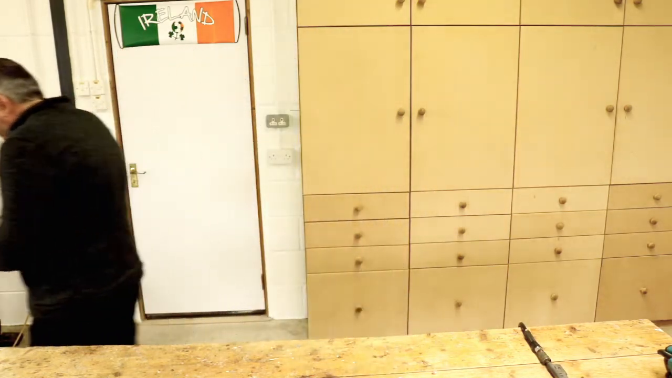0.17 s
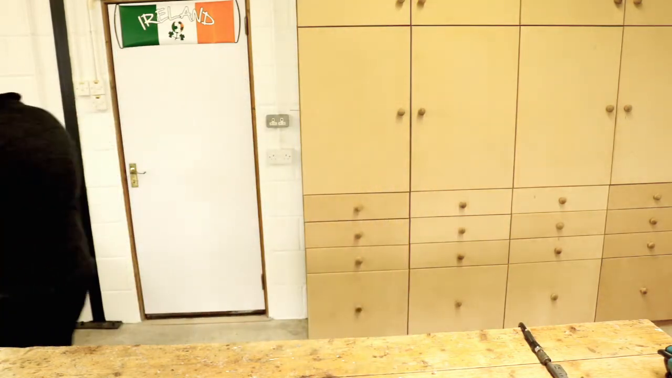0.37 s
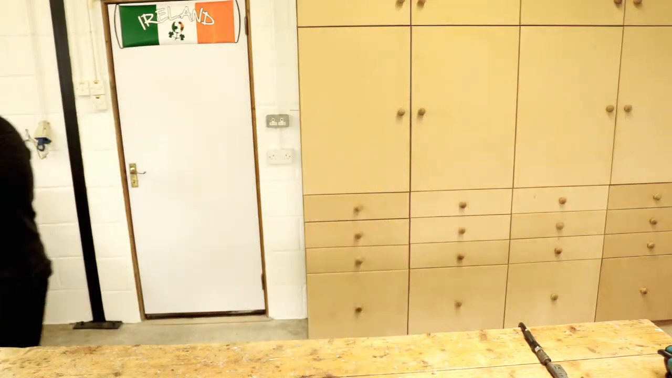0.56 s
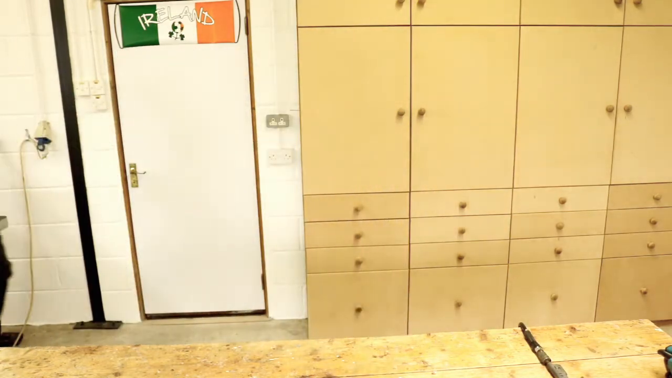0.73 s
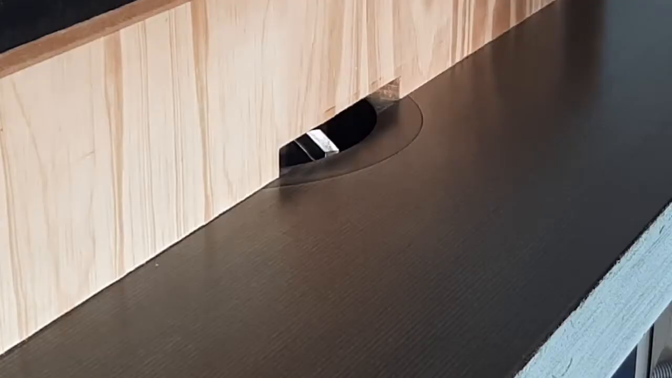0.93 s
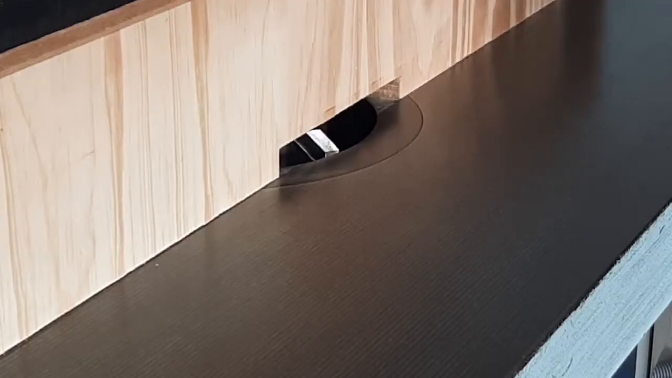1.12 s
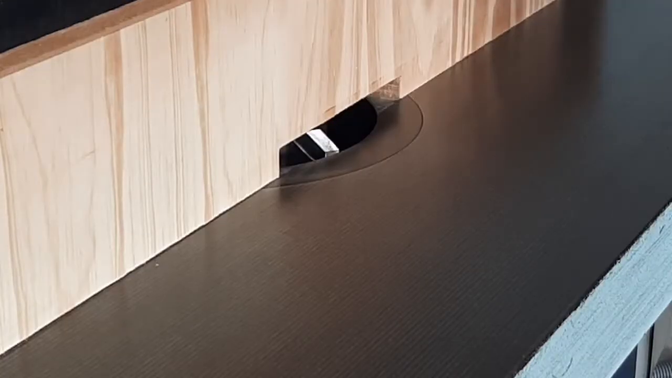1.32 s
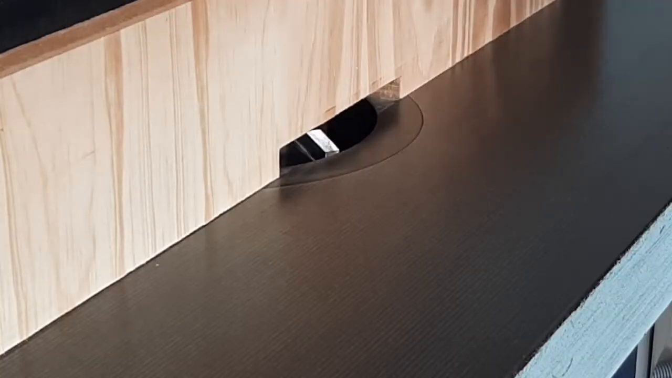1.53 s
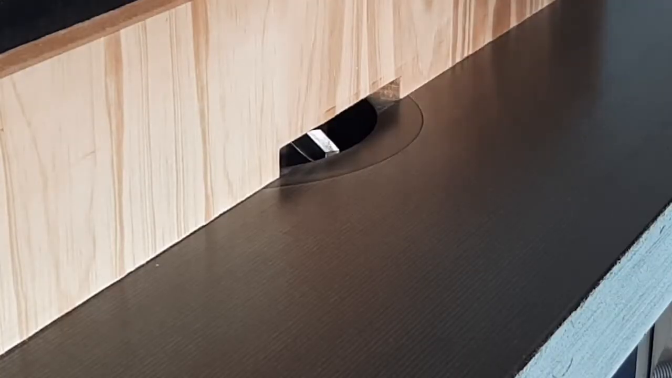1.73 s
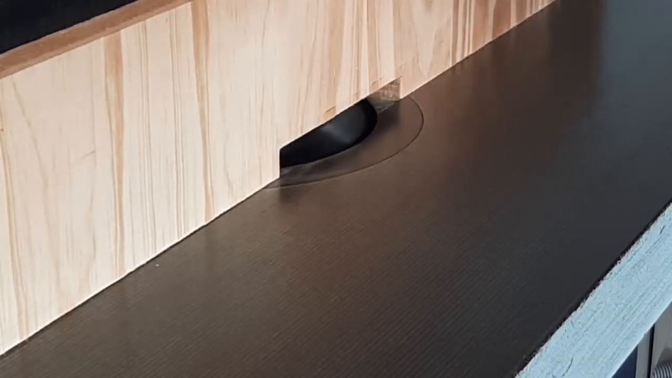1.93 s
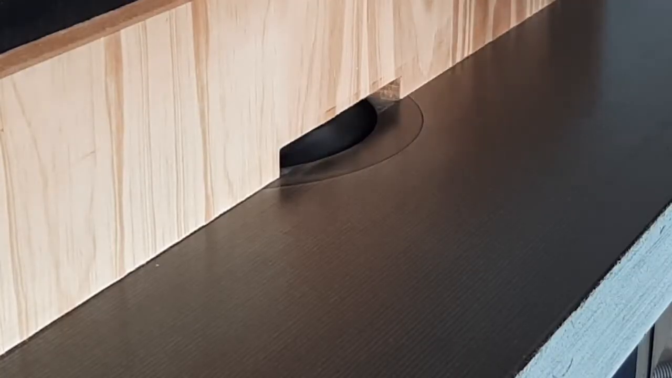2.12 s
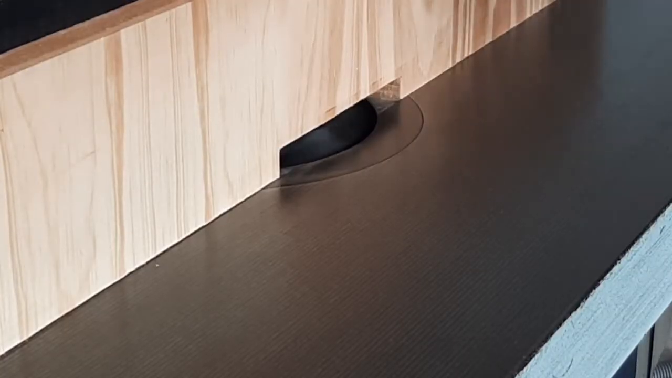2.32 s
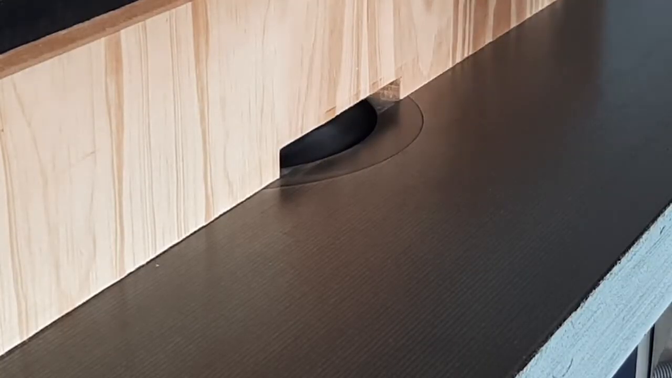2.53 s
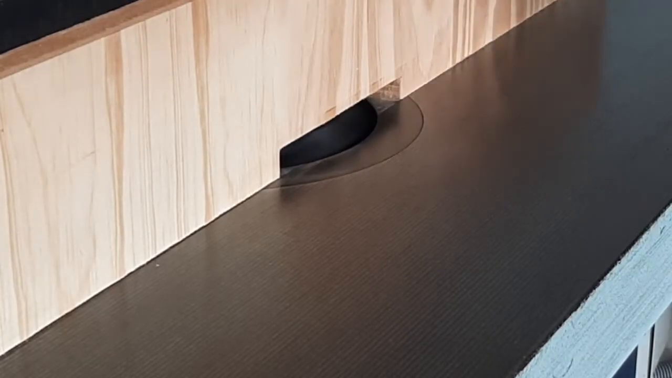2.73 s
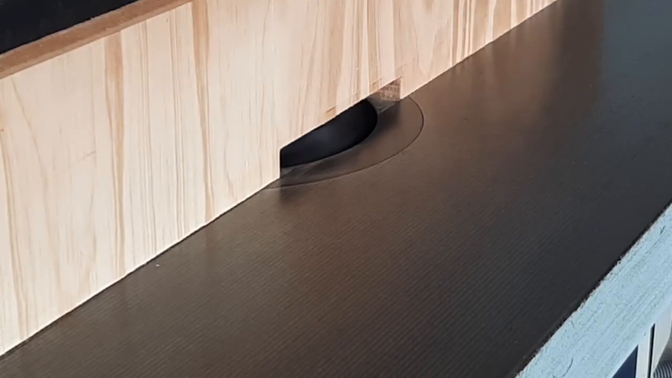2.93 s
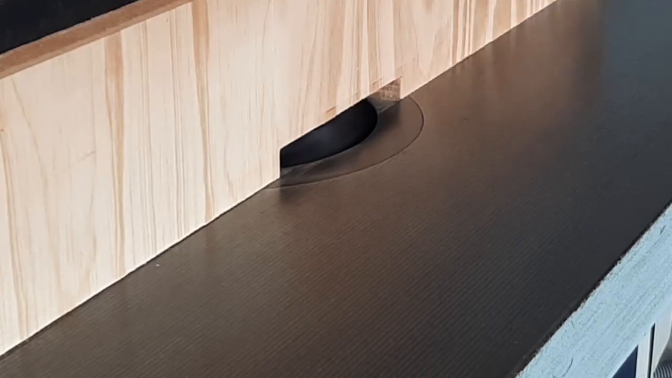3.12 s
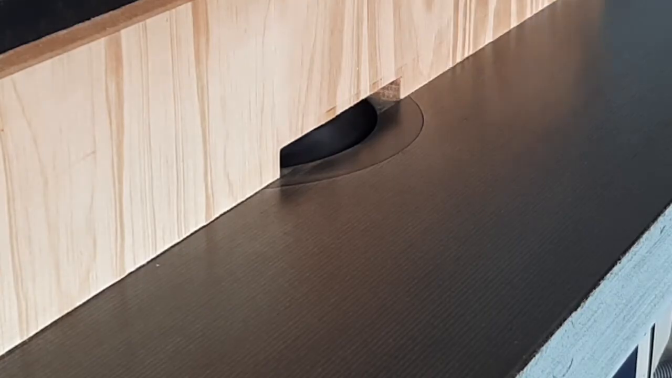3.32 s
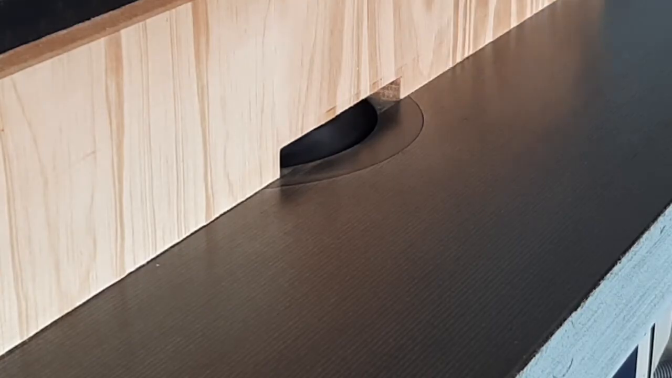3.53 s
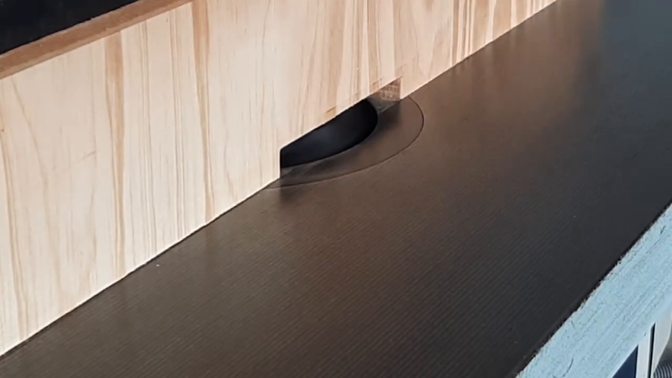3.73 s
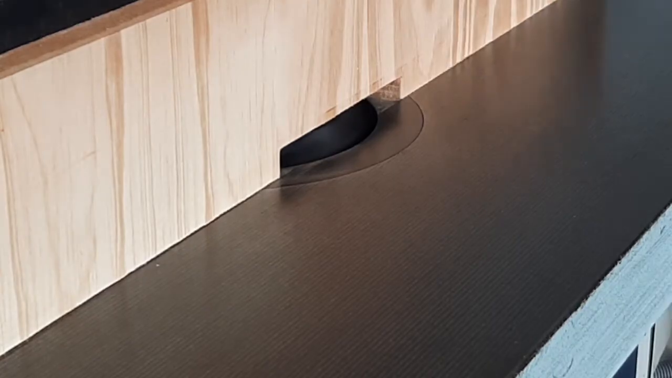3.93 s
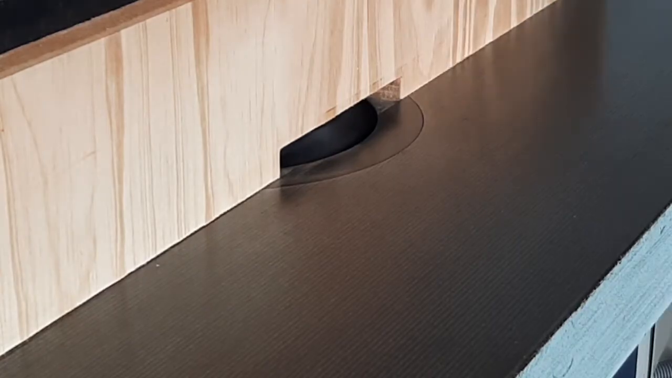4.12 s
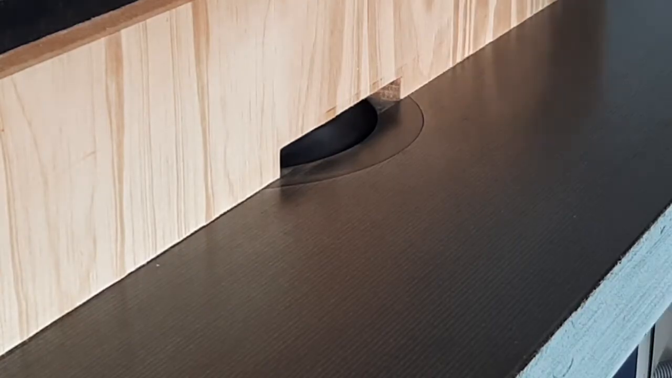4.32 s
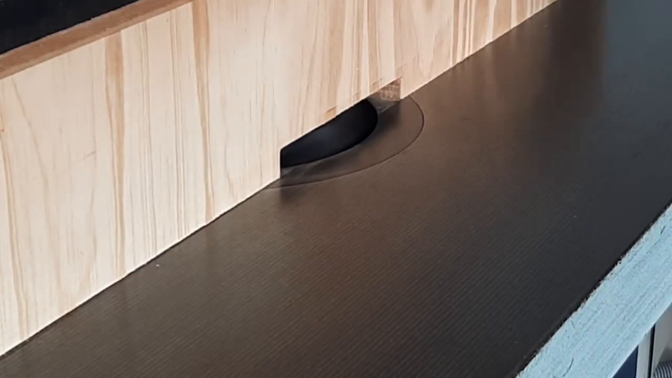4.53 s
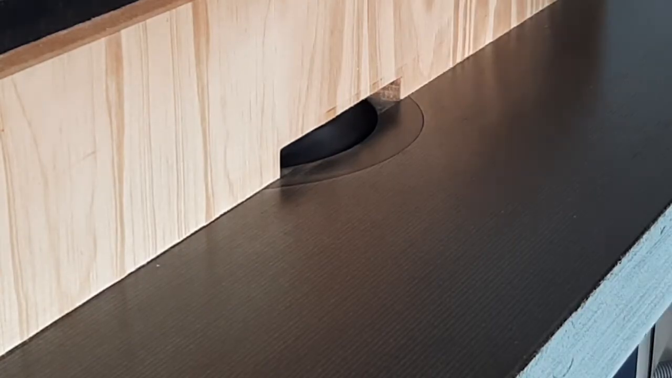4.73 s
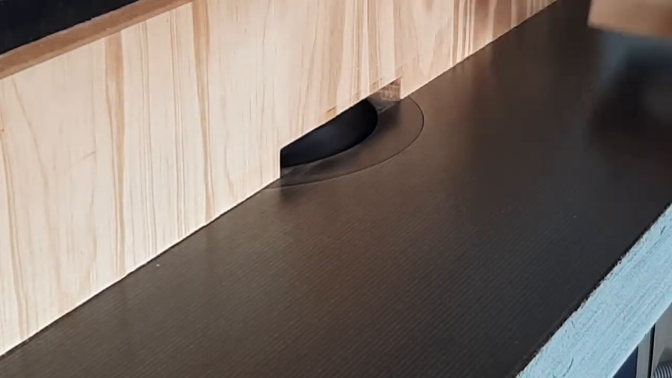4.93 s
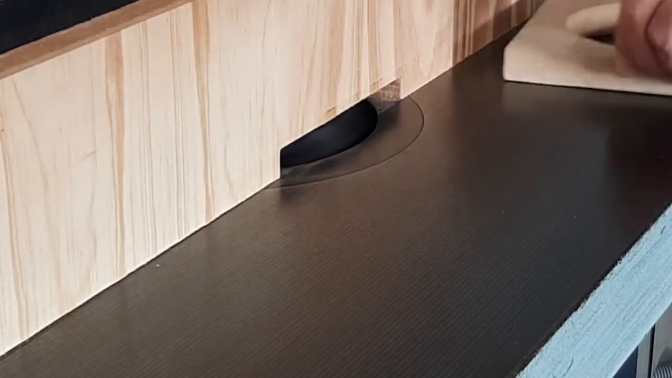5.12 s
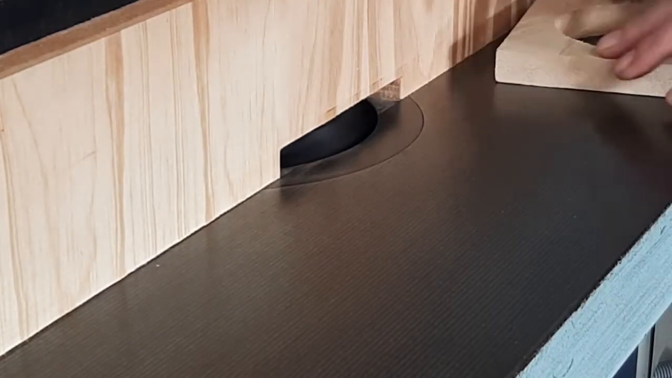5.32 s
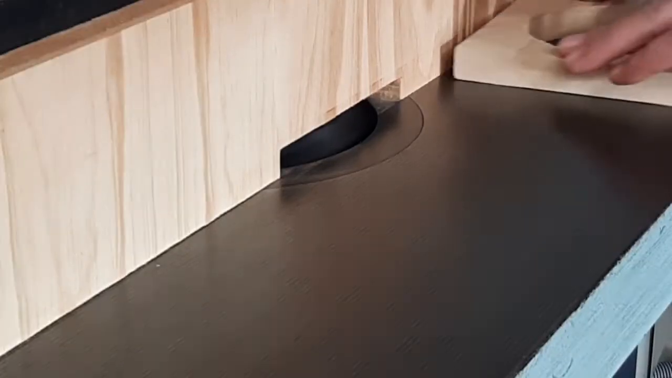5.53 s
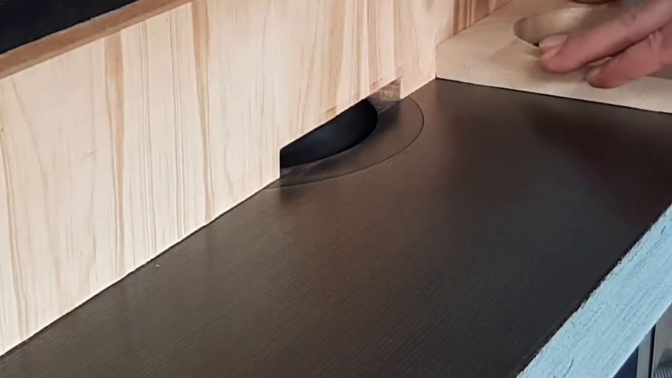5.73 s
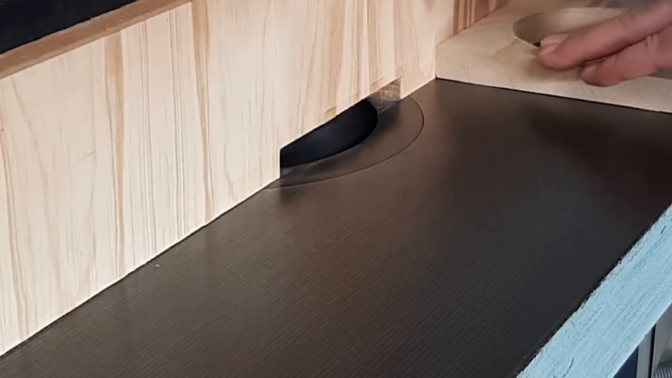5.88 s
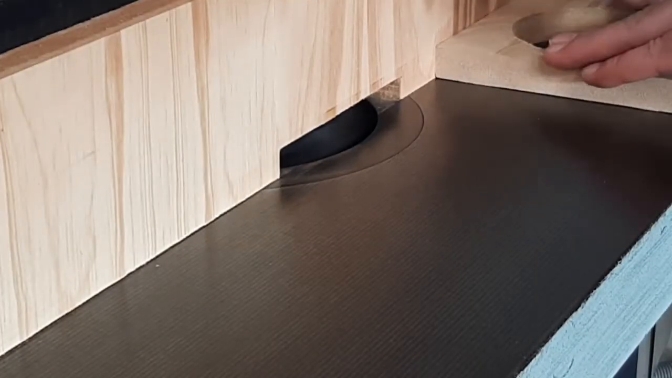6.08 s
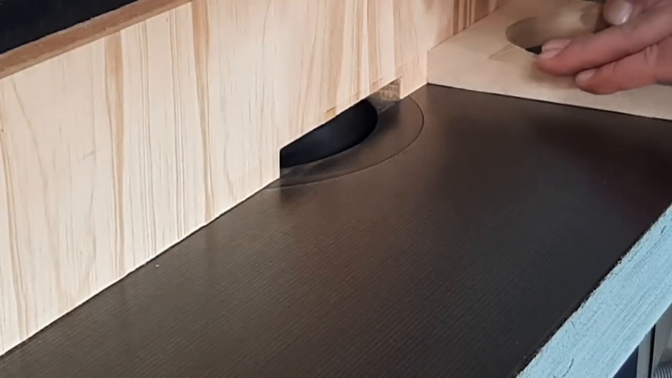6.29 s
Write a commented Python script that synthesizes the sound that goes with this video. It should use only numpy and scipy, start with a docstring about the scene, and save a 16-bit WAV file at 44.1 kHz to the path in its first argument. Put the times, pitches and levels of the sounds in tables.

```python
"""A soft air hiss and low shuffling come first, then a hard knock rings in a room and is faded out in steps.
After this first scene, mostly in mono, a close stereo scene in a joinery workshop takes over: a dust extractor
runs, a switch clicks and a spindle moulder starts. Its motor hums on the mains while the two-knife cutter spins
up and beats against the hum. Hums and rings are sine waves; hiss, rush and wind are coloured noise."""
import sys
import numpy as np
from scipy import signal
from scipy.fft import rfft, irfft, next_fast_len
from scipy.io import wavfile

SR = 44100
rng = np.random.default_rng(int(sys.argv[2]) if len(sys.argv) > 2 else 0)


def file_out(sig):
    """Save sig as 16-bit WAV at sys.argv[1]."""
    # one column per channel
    cols = np.atleast_2d(sig).T
    # limit, then scale
    lim = np.clip(cols, -1, 1)
    pcm = np.round(lim * 32767).astype(np.int16)
    wavfile.write(sys.argv[1], SR, pcm)


N = 280035
TIME = np.arange(N) / SR
FIRST_SCENE_END_S = .8595
TOP_CUT_HZ = 16020

# Spindle speed while it spins up: time_s, speed_hz (turns a second)
SPIN_UP = [(1.81, 1), (2.3, 39.5), (2.5, 55.3), (2.72, 81.2), (2.89, 99.8), (2.95, 104), (3.05, 105.05)]
# Cutter tones, before the changes with speed: multiple of a turn, level_db, left_over_right_db, left_lead_radians
CUTTER_TONES = [(1, -41, 0, 0), (2, -34.5, 0, -.18), (3, -68, 1, .1), (4, -47.8, -1, .03), (5, -63, 0, 0),
                (6, -50, -1.5, -.3), (7, -61, 0, 1.4), (8, -46.8, 0, .9), (9, -67, 0, 0),
                (10, -54.2, 3, .01), (12, -58.7, -2, .6), (14, -64.5, 4, .6), (18, -69, 0, 0),
                (24, -70, 0, 0)]
# Cabinet resonances and dead spots that the cutter tones sweep through: pitch_hz, width_hz, lift_db
CABINET = [(50, 60, -17), (103, 20, 8), (145, 34, -14), (190, 60, 13), (203, 9, 8), (220, 30, 4),
           (255, 50, 18), (300, 50, -6), (365, 60, 10), (450, 60, 4), (540, 60, 5), (675, 50, 10),
           (838, 70, 6), (970, 50, 8)]
# Colour of the cutter wind: pitch_hz, level_db (per Hz)
WIND_COLOUR = [(15, -67), (60, -15), (110, -3.5), (155, -20.5), (230, -9.5), (450, -8), (800, -16.5),
               (1150, -19), (4000, -24.5), (7570, -32), (8670, -47), (11300, -39.5), (15700, -46)]
# Casing resonances that colour the wind: pitch_hz, width_hz, lift_db
CASING = [(340, 17, 1.5), (380, 120, 0), (526, 12.5, 3.5), (668, 35, 4), (760, 26, -5.5), (910, 480, 6.5),
          (1496, 140, 5.5), (1563, 26, 8), (2032, 87, 6), (2160, 72, 8), (2175, 40, -7), (2540, 50, 3.5)]
# Panels that buzz as the spindle passes their speed: pitch_hz, width_hz, level_db,
# speed_share (of full speed), share_span (of full speed)
PANELS = [(428, 48, -45.5, 0.41, 0.16), (663.4, 39, -47.5, 0.6, 0.22), (879, 40, -54, .6, 0.18),
          (973, 26, -52, .85, 0.085), (1200, 50, -54.5, 0.89, .07), (296, 25, -46, 0.75, .05),
          (200, 12, -44, 0.92, .02)]
# Colour of the shaking panels: pitch_hz, level_db (per Hz)
SHAKE_COLOUR = [(150, -42), (300, 1), (700, 9), (1100, -4), (1800, -33)]
# How alike left and right are in most wide noises: pitch_hz, likeness (1 is the same)
LIKENESS = [(60, 0.92), (130, 0.97), (290, 0.98), (640, 0.6), (1410, 0.79), (3100, 0.53), (6820, 0.75),
            (15000, 0.18)]
MAINS_HUM_HZ, BEAT_PEAK_S = 100.03, 4.62
MOTOR_ON_S, MOTOR_RISE_S, PULL_END_S, PULL_RELEASE_S = 1.907, 0.019, 2.926, 0.084
# hum level before its changes, gain at full speed, surge under pull
HUM_DB, HUM_FULL_SPEED_DB, HUM_SURGE_DB, SURGE_POWER = -36.5, 1.5, 10, 5.4
# the hum throbs at low speed
THROBS_PER_S, THROB_DIP_S, THROB_DEPTH = 10.6, 2.08, .7
WIND_DB, WIND_DB_PER_DECADE = -40, 7
# the wind turns bright around this share of full speed
EDGE_DULL_DB, EDGE_SHARE, EDGE_SPAN = -16, 0.57, 0.084
KNIFE_EARLY_DB_PER_DECADE, KNIFE_DB, KNIFE_PULL_DB, KNIFE_CREEP_DB_PER_S = 25, -2.5, -0.5, 1.5
RUN_UP_UNREST = .2   # the cutter tones waver by this share more before full speed
SHAKE_DB, SHAKE_RISE_S, SHAKE_END_S = -46, 0.32, 2.85

# Start switch, its press, latch and bounce: start_s, crackle_db, box_ring_db, button_ring_db
SWITCH_CONTACTS = [(1.775, -36, -50, -36), (1.813, -41.5, -58, -49), (1.8223, -48, -27.5, -41),
                   (1.8303, -58, -37, -58)]
# Ring of the switch box: pitch_hz, level_db (added to the ring), t60_s (time to die by 60 dB)
BOX_MODES = [(1506, 0, 0.07), (1556, -9, 0.14)]
# Ring of the button: pitch_hz, level_db (added to the ring), t60_s (time to die by 60 dB)
BUTTON_MODES = [(2090, 0, 0.049), (1390, -1, 0.04), (2640, -7, 0.03), (404, 7.5, 0.069), (90, 3, 0.2)]
# Faint ticks in the run-up: start_s, level_db
TICKS = [(2.315, -42), (2.365, -43)]
SWITCH_LAG_S = 0.0001   # the switch is nearer the left side

# The knock and its bounces: start_s, level_db, brightness_db, crack_hz
KNOCKS = [(.6108, -32, 0, 2300), (.6152, -23, -20, 230), (.6176, -22.5, 0, 1950), (.6187, -16, 0, 4300),
          (.6226, -19, -4, 330), (.6227, -22, -1, 2300), (.6243, -13.5, -6, 6250), (.633, -23.5, -10, 260),
          (.638, -23, -12, 300), (.662, -24, -20, 340), (.705, -21, -20, 180), (.721, -27, -20, 120),
          (.731, -28, -20, 130), (.763, -25, -20, 280)]
# Colour of the knock noise: pitch_hz, level_db (per Hz)
KNOCK_COLOUR = [(24, -33), (60, -37), (200, 0), (480, -6.5), (700, -10.5), (1050, -12.5), (1450, -15),
                (1800, -9.5), (2500, -11), (4200, -5.5), (6300, -14.5), (7200, -21.5), (9700, -39),
                (14000, -58)]
# Resonances in the knock noise: pitch_hz, width_hz, lift_db
KNOCK_RINGS = [(2080, 150, 8.5), (2270, 54, 10), (2590, 60, 12), (3160, 53, 6), (3920, 57, -3),
               (4200, 56, 4), (4630, 120, 0), (5000, 37, 6.5), (6060, 280, 6)]
KNOCK_PATCHY_DB = 1.5
ROOM_T60_S, ROOM_DB, FIRST_ECHO_S = 0.81, -13.5, 0.0033

# Tones of the seven-blade fan: multiple of a turn, level_db, left_over_right_db, left_lead_radians
FAN_TONES = [(1, -60.5, 3, 0), (2, -51.5, 1, 0), (4, -48, -3, 0.1), (5, -60.5, 0, 0), (6, -71, 2, 0),
             (7, -47, 14, 0.63), (11, -69, 7, 0.44), (12, -58.5, 3, 0), (13, -61, -3, 0.23),
             (14, -70, 21, 0.24)]
# Thin whines of the extractor: pitch_hz, level_db
WHINES = [(10917, -75), (11326, -89.5), (13647, -80), (14223, -83)]
# Colour of the air rush: pitch_hz, level_db (per Hz)
RUSH_COLOUR = [(15, -54), (40, -28), (96, -8), (200, -6), (450, -17.5), (700, -14), (1150, -20),
               (1800, -21.5), (3500, -23.5), (5500, -29.5), (7100, -25.5), (8000, -29), (8700, -54.5),
               (11000, -31.5), (15700, -30.5)]
# Duct resonances in the rush: pitch_hz, width_hz, lift_db
DUCT = [(195.6, 8.2, 11), (96.5, 14, 8), (450, 83, 10), (1517, 68, 9), (4390, 240, 5.5)]
# How alike left and right are in the rush: pitch_hz, likeness (1 is the same, below 0 is opposed)
RUSH_LIKENESS = [(60, 0.99), (110, 1), (200, 0.91), (380, 0.86), (700, 0.16), (1290, -0.71), (2380, 0.17),
                 (4400, -0.16), (8120, 0.15), (15000, 0.3)]
FAN_TURN_HZ, RUSH_DB = 49.17, -42.5
# the extractor sinks as the spindle gains speed, down to the full sink at this share of full speed
TONE_SINK_DB, RUSH_SINK_DB, SINK_DONE_SHARE = -7, -4, 0.45

# Low shuffles, each with a dull thud: start_s, rumble_db, thud_db, thud_hz
SHUFFLES = [(.028, -39, -25.5, 163), (.046, -48, -26, 251), (.058, -53, -32, 106), (.079, -48, -32, 188),
            (.12, -46, -35, 210), (.142, -50, -32, 155), (.185, -46, -30, 248), (.227, -47, -35, 200),
            (.275, -49, -40, 90)]
# Colour of the shuffling: pitch_hz, level_db (per Hz)
SHUFFLE_COLOUR = [(12, -36), (20, -18), (96, -5.5), (155, -1.5), (188, -3.5), (274, -5.5), (323, -10),
                  (511, -23), (602, -25), (1000, -39), (1300, -52), (2200, -120)]
# Colour of the soft air hiss: pitch_hz, level_db (per Hz)
HISS_COLOUR = [(290, -6.5), (500, -0.5), (676, -4), (737, -4), (1070, -7), (1430, -8), (1530, -7.5),
               (1720, -6), (2130, -9.5), (4910, -4.5), (7780, -18.5), (15500, -53)]
# Low drone of the first scene: pitch_hz, level_db
ROOM_DRONE = [(46.5, -45), (93.7, -43.5)]
# Colour of the preamp hiss: pitch_hz, level_db (per Hz)
PREAMP_COLOUR = [(3000, -10), (7000, -7), (10000, 9), (15800, 7.5)]
# Steps that fade out the first scene: start_s, change_db
FADE_STEPS = [(.789, -8.5), (.833, -7)]
HISS_DB, HISS_HOLD_S, HISS_FALL_DB_PER_S = -44, 0.35, 12   # the air hiss holds, then sinks
THUD_CYCLES = 3.0   # cycles to die by 20 dB
SHUFFLE_RISE_S, SHUFFLE_T60_S, SHUFFLE_FLOOR_DB = 0.015, 0.33, -50.5
PREAMP_DB, FADE_RAMP_S = -61, .01


def moulder():
    """Mains hum, cutter tones that swell as they sweep resonances, knife-puffed wind and shaking panels."""
    speed, share = spindle_speed(), speed_share()
    running = attack(MOTOR_ON_S, MOTOR_RISE_S)
    settled = attack(PULL_END_S, PULL_RELEASE_S)
    pull = share ** SURGE_POWER * (1 - settled)   # the motor pulls hardest just below full speed
    angle = 2 * np.pi * np.cumsum(speed) / SR
    angle -= angle[round(BEAT_PEAK_S * SR)]   # hum and unbalance tone add up at this moment
    hum = mains_hum(share, pull)
    tone = cutter(angle, speed, share, pull, settled)
    wind = cutter_wind(angle, share)
    return hum * running + tone + panels(share, settled) + running * wind


def mains_hum(share, pull):
    """The motor hums at a fixed mains pitch, throbs at low speed and surges when it pulls hard."""
    hum_db = HUM_DB + HUM_FULL_SPEED_DB * np.sqrt(share) + HUM_SURGE_DB * pull + 0.29 * drift(6.5)
    dips = np.cos(np.pi * THROBS_PER_S * (TIME - THROB_DIP_S)) ** 4
    throb = 1 - THROB_DEPTH * (1 - share) * dips
    wave = np.cos(2 * np.pi * MAINS_HUM_HZ * (TIME - BEAT_PEAK_S))
    return np.sqrt(2) * throb * amp(hum_db) * wave * amp([[.8], [-.8]])


def cutter(angle, speed, share, pull, settled):
    """Tones locked to the turning cutter grow with speed and swell where they meet cabinet resonances."""
    growth_db = 26 * np.log10(share)
    # the tone of the knife passes comes early, dips slightly under the pull, then creeps up
    knife_db = (KNIFE_DB - KNIFE_EARLY_DB_PER_DECADE * np.log10(share) + KNIFE_PULL_DB * pull
                + KNIFE_CREEP_DB_PER_S * np.maximum(TIME - PULL_END_S, 0))

    def lift_db(k):
        """Level change of one tone with speed; k=2 is the pass of the two knives."""
        cabinet_db = bumps_db(CABINET, k * speed) - bumps_db(CABINET, k * speed[-1])
        return growth_db + cabinet_db + knife_db * (k == 2)

    unrest = 1 + RUN_UP_UNREST * (1 - settled)
    return tones(angle, CUTTER_TONES, waver_db=.45, spread=1.2, lift_db=lift_db, unrest=unrest)


def cutter_wind(angle, share):
    """Air noise coloured by the casing; each knife puffs its brighter part, which grows with speed."""
    wind = noise(WIND_COLOUR, CASING)
    body = signal.sosfilt(signal.butter(1, 700, fs=SR, output="sos"), wind)
    puffs = 1 + 0.17 * np.cos(2 * angle) + 0.1 * np.cos(4 * angle)   # two knives a turn
    edge_db = EDGE_DULL_DB / (1 + np.exp((share - EDGE_SHARE) / EDGE_SPAN))
    wind_db = WIND_DB + WIND_DB_PER_DECADE * np.log10(share) + .5 * drift(11.0)
    return amp(wind_db) * (body + amp(edge_db) * puffs * (wind - body))


def panels(share, settled):
    """Panels shake during the run-up, and each buzzes most as the spindle passes its own speed."""
    swell = attack(MOTOR_ON_S, SHAKE_RISE_S) ** 2 * (1 - attack(SHAKE_END_S, PULL_RELEASE_S))
    shake = amp(SHAKE_DB) * swell * noise(SHAKE_COLOUR)
    for hz, width_hz, db, at_share, span in PANELS:
        buzz = noise([(hz / 2, -30), (hz, 0), (hz * 2, -30)], [(hz, width_hz, 30)])
        nearness = np.exp(-.5 * ((share - at_share) / span) ** 2)
        shake = shake + amp(db) * nearness * (1 - settled) * buzz
    return shake


def switch():
    """Each contact gives a burst of crackle and rings box and button; later come two bare ticks."""
    out, crackle = np.zeros((2, N)), noise(WIND_COLOUR)
    crackle = signal.sosfilt(signal.butter(2, 900, "high", fs=SR, output="sos"), crackle)
    for s, db, box_db, button_db in SWITCH_CONTACTS:
        age, rise = np.maximum(TIME - s, 0), attack(s, .004)
        ear_age = np.maximum(age - [[0], [SWITCH_LAG_S]], 0)   # the right side hears it later
        out += amp(db) * rise * np.exp(-age / 0.026) * crackle
        for ring_db, modes in ((box_db, BOX_MODES), (button_db, BUTTON_MODES)):
            for hz, mode_db, t60_s in modes:
                level = amp(ring_db + mode_db - 60 * age / t60_s)
                out += level * rise * np.sin(2 * np.pi * hz * ear_age)
    for s, db in TICKS:
        out += amp(db) * (TIME > s) * np.exp(-np.maximum(TIME - s, 0) / 0.011) * crackle
    return out


def knocks():
    """Each blow is a short ringing crack, a puff of noise and a later room tail; dull blows lean on the lows."""
    whole = patchy_knock_noise()
    lows = signal.sosfilt(signal.butter(2, 600, fs=SR, output="sos"), whole)
    flutter_db = 0.87 * drift(180.0)
    out = np.zeros(N)
    # each blow reads the noise from another place
    for (s, db, bright_db, crack_hz), shift in zip(KNOCKS, rng.integers(0, N, len(KNOCKS))):
        grain, low = np.roll(whole, shift), np.roll(lows, shift)
        age = np.maximum(TIME - s, 0)
        late = np.maximum(age - FIRST_ECHO_S, 0)
        puff = np.exp(-age / .0015)
        tail = amp(ROOM_DB - 60 * late / ROOM_T60_S + flutter_db) * (1 - np.exp(-late / 0.0013))
        # higher cracks die sooner
        crack = np.exp(-age * np.sqrt(crack_hz) / 0.073) * np.sin(2 * np.pi * crack_hz * age)
        blow_noise = (puff + tail) * (low + amp(bright_db) * (grain - low))
        out += amp(db) * attack(s, 0.00015) * (blow_noise + crack)
    return out


def patchy_knock_noise():
    """Noise shaped by the knock's resonances; each band of the ring swells and dips on its own."""
    whole = noise(KNOCK_COLOUR, KNOCK_RINGS, wide=False)[0]
    edges = np.geomspace(700, 9000, 8)
    for low_hz, high_hz in zip(edges, edges[1:]):
        band = signal.sosfilt(signal.butter(1, [low_hz, high_hz], "band", fs=SR, output="sos"), whole)
        whole = whole + (amp(KNOCK_PATCHY_DB * drift(35)) - 1) * band
    return whole


def extractor():
    """The turning fan gives hum tones, with thin whines and the rush of air in resonating ducts."""
    sink = np.minimum(speed_share() / SINK_DONE_SHARE, 1)
    whine = sum(amp(db + 6.0 * drift(7.6)) * np.sin(2 * np.pi * hz * TIME + .8 * drift(8.0))
                for hz, db in WHINES)
    hum = tones(2 * np.pi * FAN_TURN_HZ * TIME, FAN_TONES, waver_db=.15, spread=3)
    rush_db = RUSH_DB + RUSH_SINK_DB * sink + .5 * drift(27.0)
    rush = amp(rush_db) * noise(RUSH_COLOUR, DUCT, likeness=RUSH_LIKENESS)
    return amp(TONE_SINK_DB * sink) * (hum + whine) + rush


def shuffling():
    """Low rumbling noise swells and dies with each movement, and a dying sine gives its dull thud."""
    level, thuds = amp(SHUFFLE_FLOOR_DB), np.zeros(N)
    for s, rumble_db, thud_db, hz in SHUFFLES:
        level = level + amp(rumble_db - 60 * (TIME - s) / SHUFFLE_T60_S) * attack(s, SHUFFLE_RISE_S)
        age = np.maximum(TIME - s, 0)
        thuds += amp(thud_db - 20 * hz * age / THUD_CYCLES) * np.sin(2 * np.pi * hz * age)
    return thuds + level * noise(SHUFFLE_COLOUR, wide=False)[0]


def air_hiss():
    """Soft coloured noise that holds its level, then sinks steadily."""
    hiss_db = HISS_DB - HISS_FALL_DB_PER_S * np.maximum(TIME - HISS_HOLD_S, 0)
    return amp(hiss_db) * noise(HISS_COLOUR, wide=False)[0]


def room_drone():
    """Low steady pitches whose levels waver slowly."""
    return sum(amp(db + 1.6 * drift(8.0)) * np.sin(2 * np.pi * hz * TIME) for hz, db in ROOM_DRONE)


def first_scene():
    """Sums knock, shuffling, hiss and drone, fades them in two steps and leaves some preamp hiss unfaded."""
    preamp = amp(PREAMP_DB) * noise(PREAMP_COLOUR)
    fade_db = sum(db * np.clip((TIME - s) / FADE_RAMP_S, 0, 1) for s, db in FADE_STEPS)
    faded = amp(fade_db) * (knocks() + shuffling() + air_hiss() + room_drone() + preamp)
    return (faded + amp(-11) * preamp) * (TIME < FIRST_SCENE_END_S)


def tones(angle, orders, waver_db, spread, lift_db=lambda k: 0, unrest=1):
    """Sines locked to a turning shaft, each wavering on its own; the spread scatters their starts."""
    out = np.zeros((2, N))
    for k, db, pan_db, lead in orders:
        start = spread * rng.standard_normal() * (k > 1)
        chance = 1.9 * drift(0.33) + 3.0 * drift(25.0)
        wobble_db = waver_db * min(k, 5) / 3 * unrest * chance   # higher tones waver more
        level = np.sqrt(2) * amp(db + lift_db(k) + wobble_db)
        wave = np.cos(k * angle + start + [[lead / 2], [-lead / 2]])
        out += level * amp([[pan_db / 2], [-pan_db / 2]]) * wave
    return out


def noise(spectrum, modes=(), wide=True, likeness=LIKENESS):
    """Coloured noise of rms 1; a likeness table sets how alike the two channels are at each pitch."""
    size = next_fast_len(N)
    hz = np.maximum(np.arange(size // 2 + 1) * SR / size, 1)
    colour = amp(at_hz(spectrum, hz) + bumps_db(modes, hz))
    mid, side = rfft(rng.standard_normal((2, size))) * colour
    alike = np.clip(at_hz(likeness, hz), -1, 1) if wide else 1
    both = np.sqrt(1 + alike) * mid + np.sqrt(1 - alike) * side * [[1], [-1]]
    out = irfft(both, size)[:, :N]
    return out / out.std()


def drift(rate_hz):
    """Slow chance with spread 1: white noise smoothed twice above rate_hz, made at a 40th of the rate."""
    r = np.exp(-80 * np.pi * rate_hz / SR)
    white = rng.standard_normal(N // 40 + 2002)
    slow = signal.lfilter([1], [1, -2 * r, r * r], white)[2000:]   # skip the settling of the filter
    return np.interp(np.arange(N) / 40, np.arange(len(slow)), slow / slow.std())


def attack(start_s, rise_s):
    """0 before the start, then an exponential approach to 1."""
    return 1 - np.exp(-np.maximum(TIME - start_s, 0) / rise_s)


def spindle_speed():
    """Turns a second of the spindle, sample by sample."""
    times_s, speeds_hz = np.transpose(SPIN_UP)
    return np.interp(TIME, times_s, speeds_hz)


def speed_share():
    """Spindle speed as a share of full speed."""
    speed = spindle_speed()
    return speed / speed[-1]


def bumps_db(modes, hz):
    """Lift in dB that a set of resonances gives at hz."""
    return sum(db / (1 + (2 * (hz - centre_hz) / width_hz) ** 2) for centre_hz, width_hz, db in modes)


def at_hz(points, hz):
    """Reads a curve over pitch on a log-frequency axis."""
    pitches_hz, values = np.transpose(points)
    return np.interp(np.log(hz), np.log(pitches_hz), values)


def amp(db):
    """Gain of a level in dB."""
    return 10 ** (np.asarray(db) / 20)


def scene():
    """The two scenes in turn; the close one is slightly louder and one sample earlier on the left."""
    left, right = (moulder() + switch() + extractor()) * amp([[.3], [-.3]])
    close = np.array([left, np.append(0, right[:-1])])
    return first_scene() + close * attack(FIRST_SCENE_END_S, .002)


def record(dry):
    """A steep low-pass filter cuts the very top of the treble."""
    return signal.sosfilt(signal.cheby2(20, 70, TOP_CUT_HZ, fs=SR, output="sos"), dry)


dry = scene()
out = record(dry)
file_out(out)
```